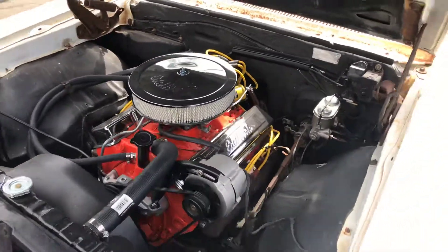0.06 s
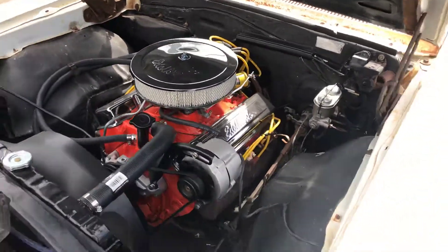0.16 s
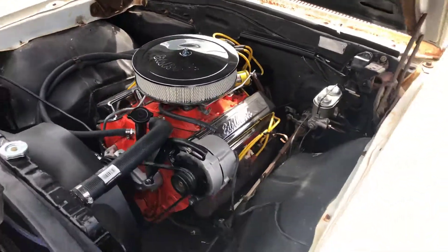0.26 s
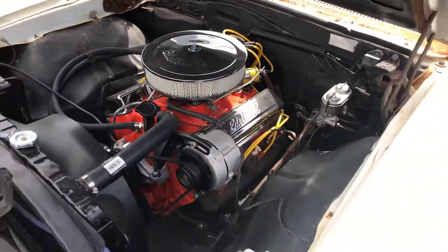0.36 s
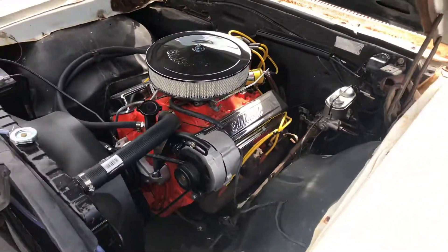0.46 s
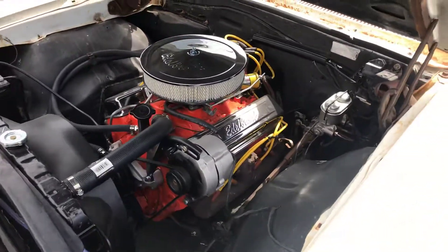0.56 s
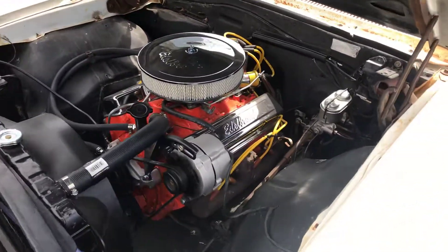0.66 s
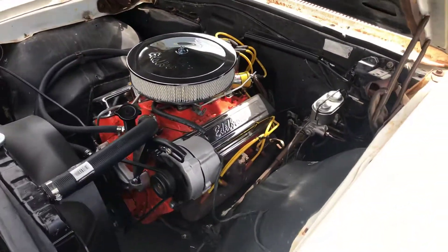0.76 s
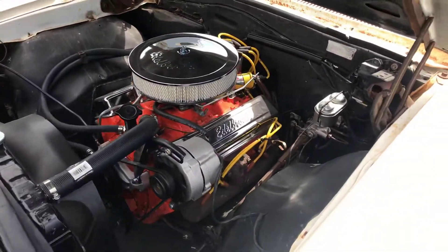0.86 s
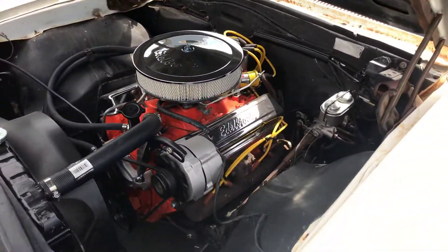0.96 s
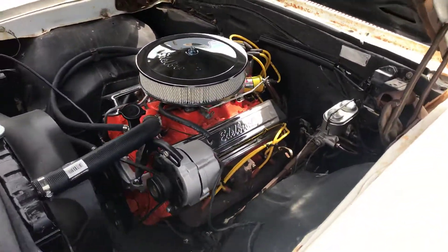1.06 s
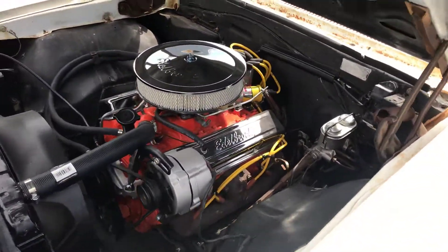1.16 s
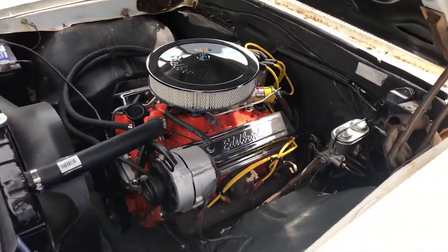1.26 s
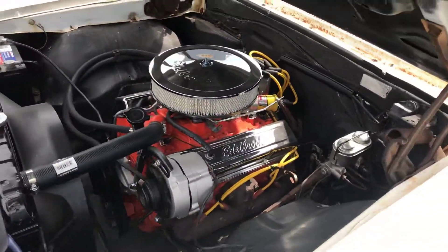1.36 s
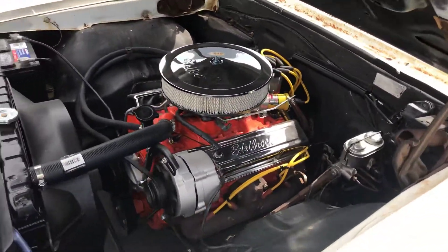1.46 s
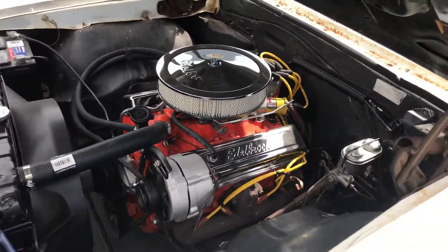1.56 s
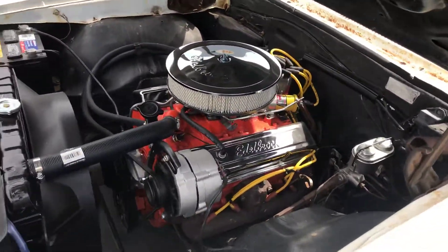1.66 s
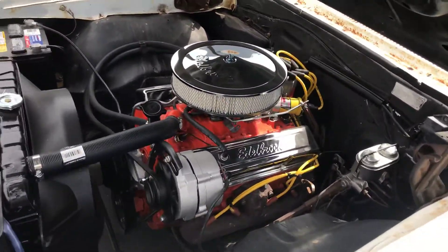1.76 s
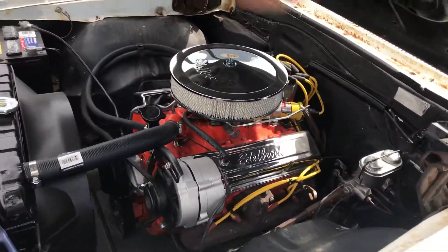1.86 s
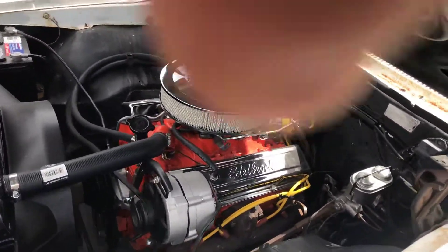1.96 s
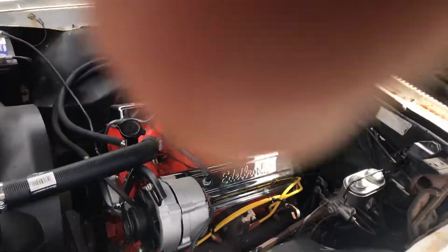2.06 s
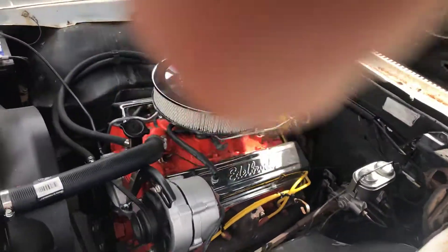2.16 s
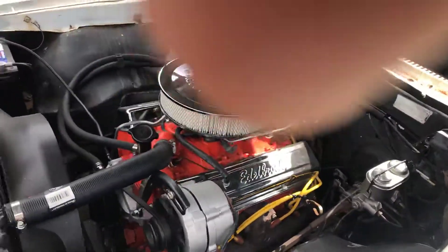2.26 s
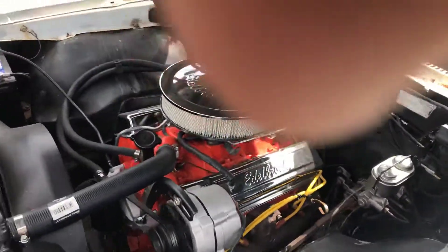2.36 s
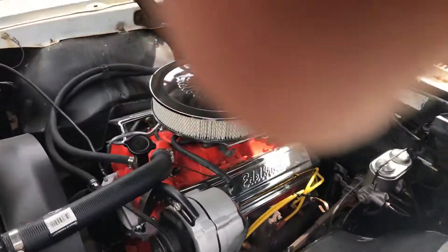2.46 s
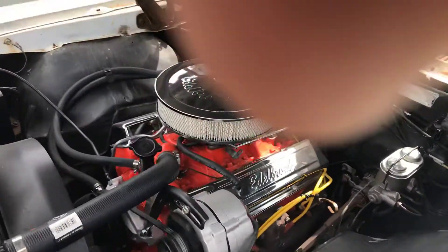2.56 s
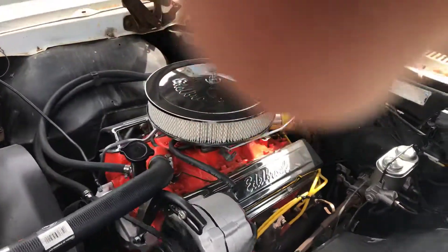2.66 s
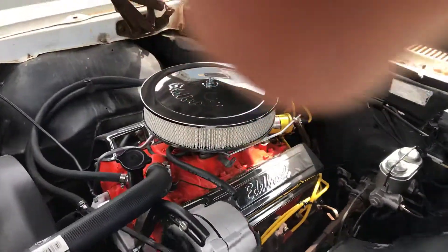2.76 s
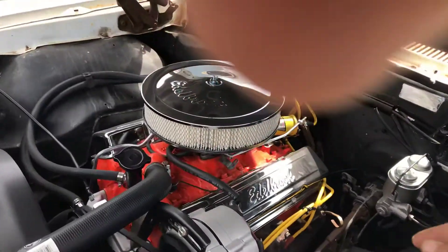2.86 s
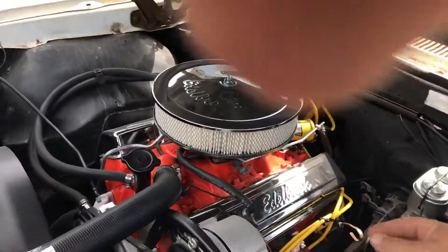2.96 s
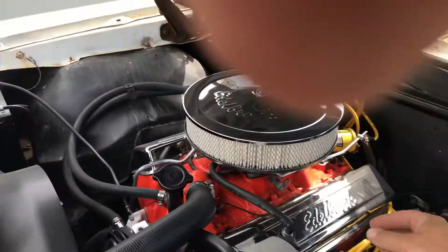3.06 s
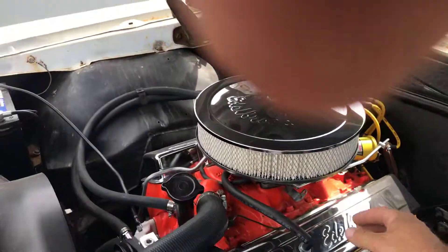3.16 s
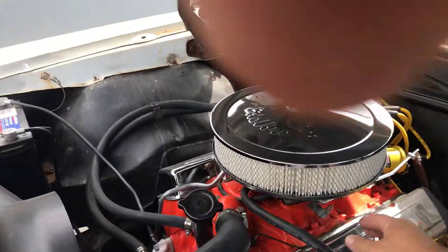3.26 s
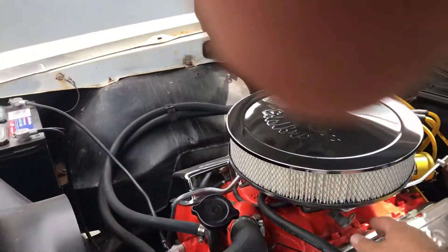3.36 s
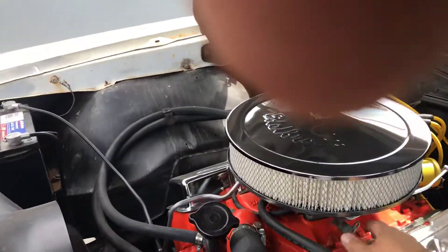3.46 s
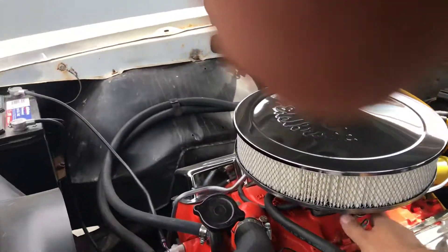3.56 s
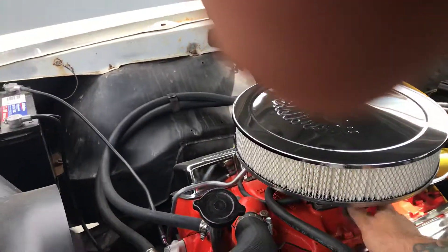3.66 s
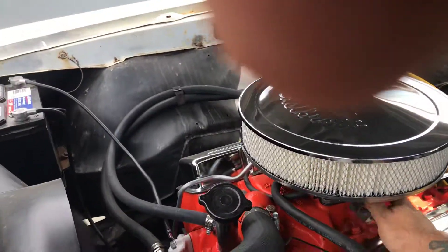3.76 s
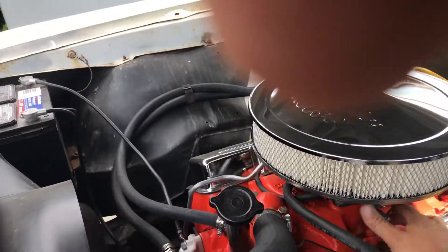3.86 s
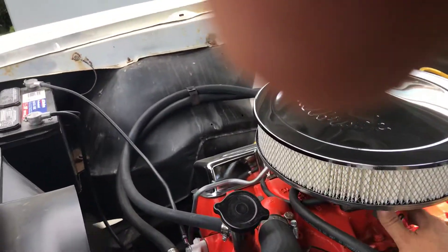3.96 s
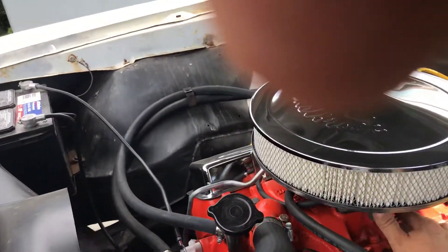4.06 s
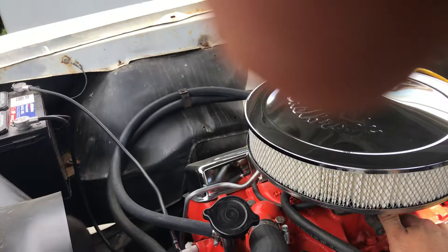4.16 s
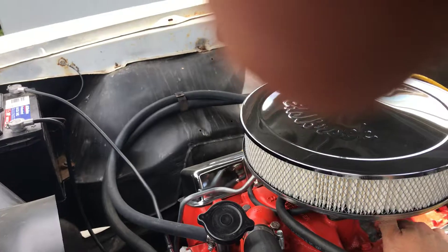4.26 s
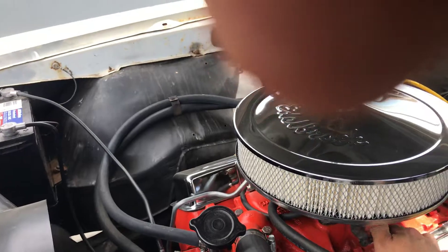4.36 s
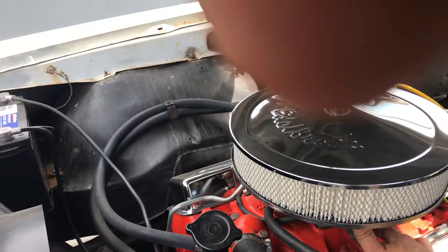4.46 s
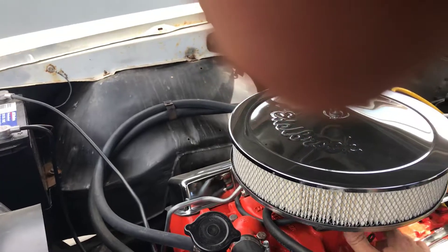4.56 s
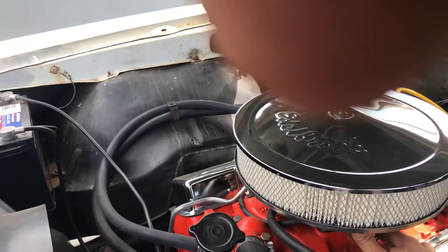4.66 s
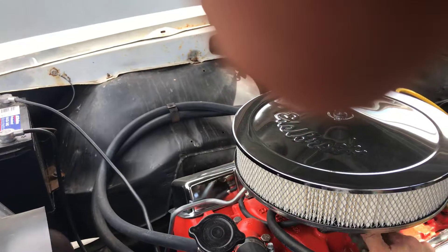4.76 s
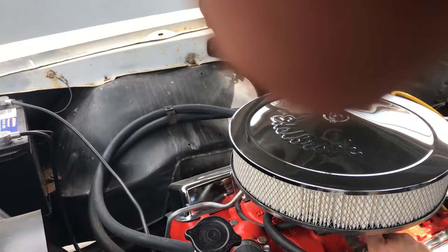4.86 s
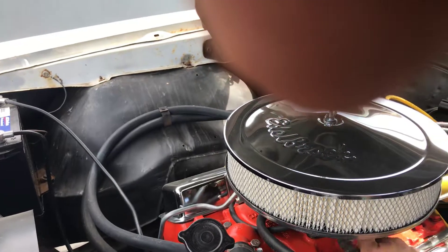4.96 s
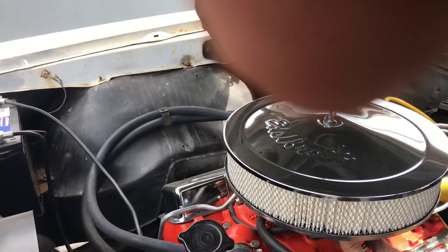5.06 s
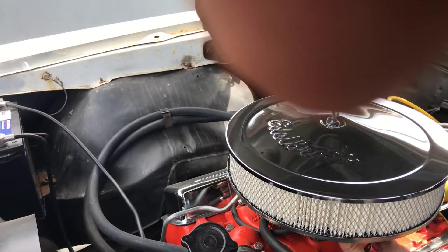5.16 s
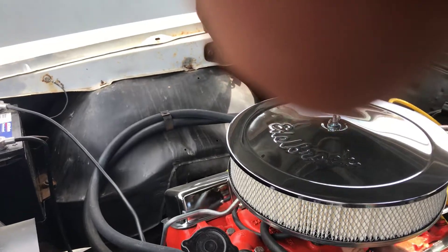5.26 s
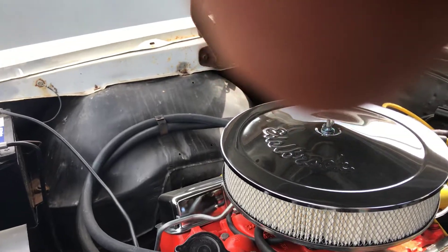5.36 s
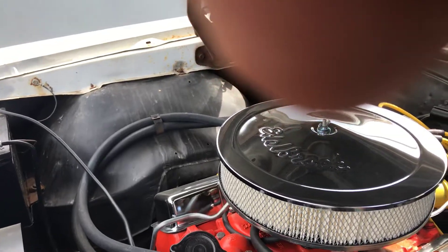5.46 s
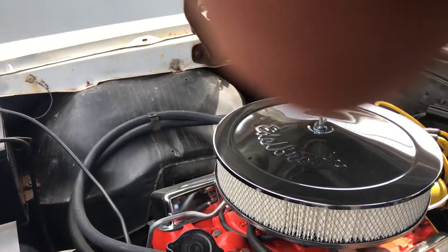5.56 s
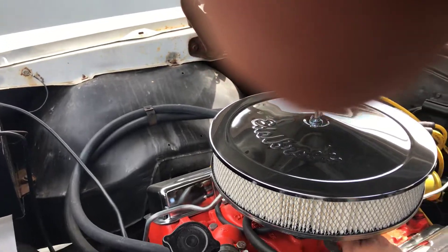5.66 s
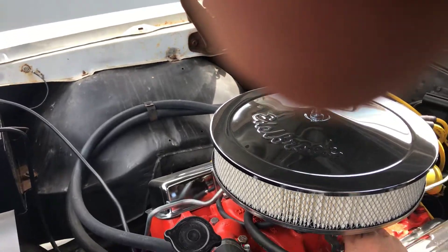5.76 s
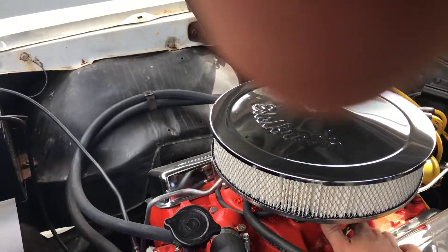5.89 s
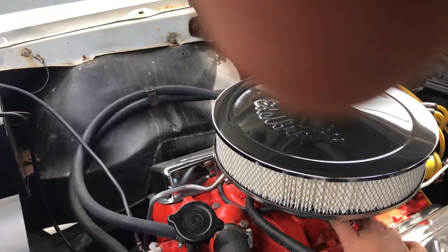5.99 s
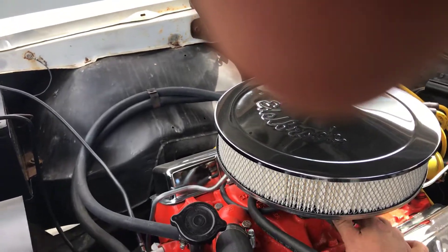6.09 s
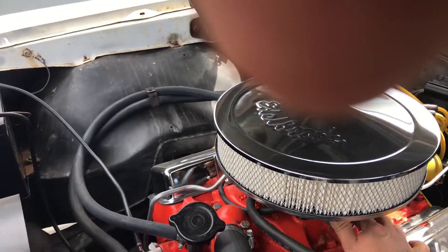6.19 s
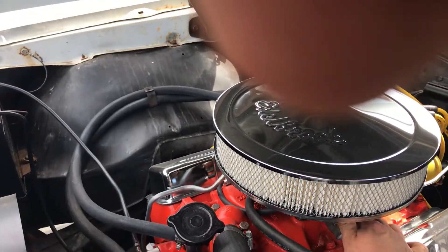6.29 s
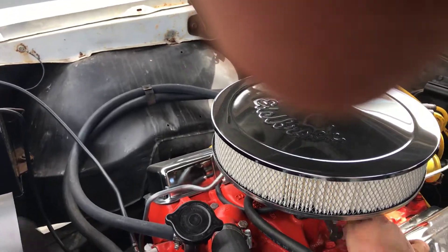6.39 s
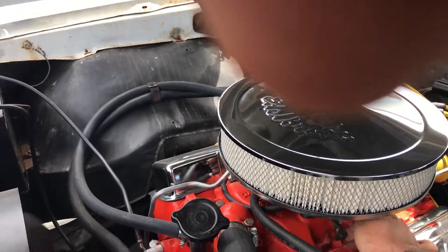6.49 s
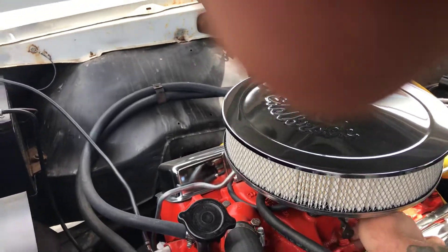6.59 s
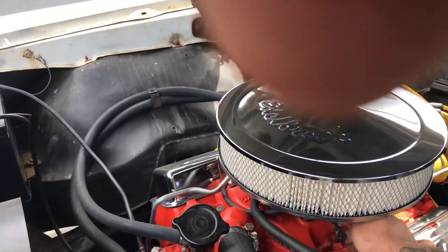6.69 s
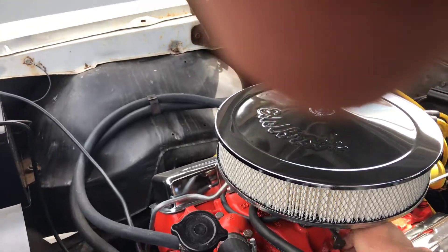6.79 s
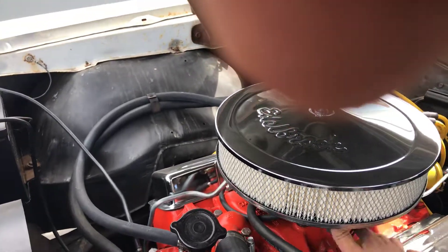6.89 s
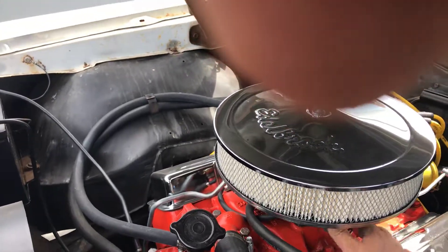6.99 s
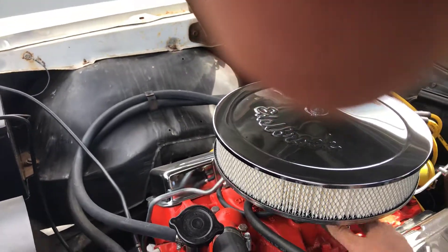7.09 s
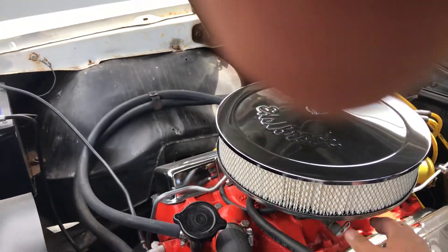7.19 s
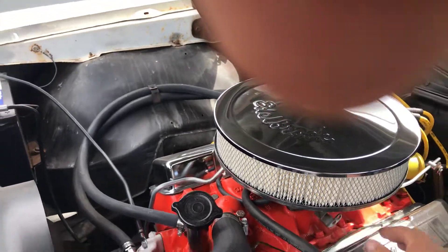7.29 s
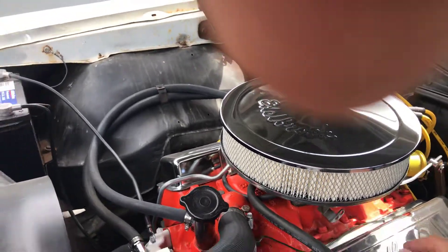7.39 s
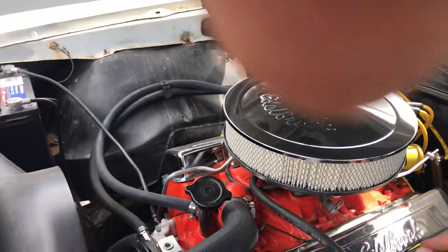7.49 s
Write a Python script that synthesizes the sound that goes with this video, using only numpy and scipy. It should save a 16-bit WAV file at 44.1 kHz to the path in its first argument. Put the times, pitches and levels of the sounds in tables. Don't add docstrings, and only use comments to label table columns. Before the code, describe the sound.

A V8 engine idles in a lumpy low rumble under an open hood, then roars through four throttle blips, the last revving highest.

```python
import sys
import numpy as np
from scipy import signal
from scipy.fft import rfft, irfft
from scipy.io import wavfile
from scipy.ndimage import uniform_filter1d, minimum_filter1d

SR = 44100
rng = np.random.default_rng(int(sys.argv[2]) if len(sys.argv) > 2 else 0)


def store_pcm(level_fs):
    pcm = np.round(np.clip(level_fs, -1, 1) * 32767).astype(np.int16)
    wavfile.write(sys.argv[1], SR, np.atleast_2d(pcm).T)


def decibels_to_gain(level_db):
    exponent = np.asarray(level_db, float) / 20
    return 10 ** exponent


N = 332073
t = np.arange(N) / SR

# (time [s], firing rate [Hz])
CRANK_SPEED = [(0, 49.9), (4.14, 48.5), (4.36, 77.4), (4.62, 112.9), (4.83, 104), (4.91, 132.4),
               (5.13, 168.3), (5.45, 132), (5.64, 127), (5.76, 151.4), (6.0, 159.4), (6.25, 130.7),
               (6.37, 125.9), (6.46, 145.8), (6.58, 164.4), (6.88, 294.5), (7.06, 291.7), (7.47, 225.5)]
# (time
# [s], level [dB])
BLOCK_EFFORT = [(0, -30.5), (1.4, -29), (2.76, -27.5), (3.37, -23.5), (4.13, -24), (4.3, -21), (4.42, -18),
                (4.7, -14.5), (4.8, -15), (5.1, -11.5), (5.25, -13), (5.6, -16.5), (5.94, -18),
                (6.05, -16.5), (6.35, -18), (6.9, -17.5), (7.1, -15), (7.53, -20)]
CYLINDER_DB = [-4.5, -5, -5.5, -5, -7, -6.5, -3.5, -8.5]
# (frequency [Hz], level per Hz [dB])
EXHAUST_IDLE = [(18, -32), (30, -13), (49, -5), (70, -5), (96, -6), (112, -5), (128, -9), (200, -12.5),
                (330, -15), (430, -46), (730, -120)]
EXHAUST_RACED = [(18, -43), (30, -21), (70, 4), (113, 3), (160, -2), (265, -4), (330, -3), (430, -26),
                 (730, -120)]
# (frequency [Hz], level per Hz [dB])
BLOCK_IDLE = [(130, -39), (220, -16), (281, -10.5), (491, 0), (517, 0.5), (596, -1.5), (686, -5.5),
              (756, -16), (890, -6.5), (1130, -16.5), (1300, -23), (1690, -45.5), (2860, -120)]
BLOCK_RACED = [(130, -40.5), (220, -14.5), (285, -17), (339, -4.5), (466, -4.5), (533, 0), (591, 4.5),
               (750, -7.5), (973, -8.5), (1150, -24.5), (1300, -23.5), (1690, -43), (2860, -120)]
# (frequency [Hz], level per Hz [dB])
RUSH_IDLE = [(590, -26), (1000, -11), (1120, -10.5), (1320, -6.5), (1540, -10), (1610, -11), (2010, -9),
             (2120, -10), (2300, -11), (2540, -15), (5200, -45), (6760, -61), (11400, -120)]
RUSH_RACED = [(590, -25.5), (1000, -0.5), (1150, -8.5), (1390, -3), (1680, -12.5), (1810, -7), (2050, -8.5),
              (2660, -21), (3610, -35), (4080, -41), (5200, -61), (6760, -90), (11400, -120)]
# (frequency [Hz], level per Hz [dB])
GULP_COLOUR = [(290, -39), (500, -18.5), (574, -9), (664, -2.5), (883, 1), (1160, -13), (1270, -8.5),
               (1390, -16.5), (2010, -10), (2280, -22.5), (2490, -14), (2890, -34), (5200, -60),
               (6760, -96), (11400, -120)]
# (frequency [Hz], level per Hz [dB])
HISS_STEADY = [(3000, -30), (4500, -6), (5000, -8), (5600, -2), (6600, 0), (9600, -5), (10400, -11),
               (11200, -6), (15500, -8), (16000, -12)]
HISS_OPEN = [(3000, -36), (4600, -10), (5000, -11), (5600, -1), (6400, 0), (9600, -4), (10400, -10),
             (11200, -4), (15500, -5), (16000, -9)]
# (start [s], hold [s], air level [dB], hiss level [dB], fade [dB/s])
GULPS = [(4.134, 0.037, -21, -61.5, 59), (4.259, 0.069, -25, -65, 62.5), (4.395, 0.04, -22, -62, 398),
         (4.499, 0.083, -43, -65.5, 39.5), (4.784, 0.1, -18.5, -54, 93), (4.954, 0.064, -24, -61, 26),
         (5.589, 0.075, -20.5, -57.5, 56.5), (6.333, 0.026, -23.5, -61.5, 68.5),
         (6.785, .06, -30, -63.5, 41), (6.958, 0.18, -26.5, -66, 31)]
# (start [s], rise [s], hold [s], intake drone level [dB], overtone level [dB])
PULLS = [(4.278, 0.032, 0.054, -24.5, -30), (4.48, 0.028, .035, -18, -36), (4.566, .02, 0.033, -23, -33.5),
         (4.805, 0.035, .02, -24, -27), (4.862, .05, 0.071, -13.5, -17.5),
         (5.644, 0.049, 0.055, -17, -19.5), (5.71, 0.058, 0.074, -14, -17), (6.382, .05, 0.089, -13, -23),
         (6.502, .05, 0.081, -16, -22), (6.606, 0.071, 0.16, -17, -14.5)]
# (multiple of the firing rate [1], level [dB])
OVERTONES = [(2, 0), (3, 2), (3.5, -16.5), (4, -9.5), (5, -17.5)]
# (multiple of the firing rate [1], level [dB])
OVERRUN = [(.5, -27.5), (.75, -32)]
# (frequency [Hz], level [dB])
CAVITY = [(330, -26), (435, -13), (475, 0), (640, 0), (850, 0), (960, -8), (1100, -28)]
# (time [s], peak level [dB], ring [Hz], T60 [s])
KNOCKS = [(0.081, -19.5, 520, 0.045), (0.653, -23, 432, 0.27), (0.989, -18, 620, 0.13),
          (1.076, -14, 480, 0.061), (1.239, -13.5, 568, 0.063), (3.117, -14, 521, 0.047),
          (3.458, -10, 520, 0.063), (5.327, -3, 531, 0.037), (5.352, 0.5, 554, 0.066),
          (5.436, -6, 546, 0.086), (6.209, -21, 533, 0.044), (6.475, 2, 643.6, 0.045),
          (6.503, -6, 625.6, 0.072), (6.555, 0, 638.5, 0.075)]
# (time [s], peak level [dB], ring [Hz], T60 [s])
BARKS = [
    (4.244, -3, 172.1, 0.036),
    (4.344, -2.5, 171.5, 0.046),
    (4.394, -4.5, 356, 0.047),
    (4.446, -5, 184, 0.034),
]
# (time [s], peak level [dB], frequency [Hz], T60 [s])
THUMPS = [
    (.335, -19.5, 55.1, 0.28),
    (2.101, -14.5, 71, .08),
    (4.431, -17, 44, 0.18),
    (5.49, -24, 65, 0.1),
]
# (time [s], crack peak [dB], crack [Hz], ring peak [dB], ring [Hz])
TAPS = [
    (1.771, -20.5, 1200, -17.5, 460),
    (1.886, -17, 800, -12, 390),
    (2.0985, 0.5, 880, -9, 327),
    (2.341, -11.5, 900, -13, 664),
    (2.364, -8, 900, -7, 378),
    (2.378, -14, 1800, -17, 369),
    (2.446, -12, 800, -25, 285),
    (2.46, -25, 2300, -24, 290),
    (2.491, -21, 700, -24, 283),
]
# (start [s], length [s], level [dB], cavity [Hz], width [Hz])
SLIDES = [
    (1.805, 0.135, -23.5, 564, 383.2),
    (2.095, .072, -26.5, 396.4, 600),
]
# (start [s], length [s], level [dB], cavity [Hz], width [Hz])
PRESSES = [
    (2.346, 0.056, -18.5, 379, 140),
    (2.345, 0.063, -20.5, 610, 198),
    (2.43, 0.04, -27, 320, 305),
]
# (start [s], length [s], level [dB], frequency [Hz], width [Hz])
SQUEAKS = [
    (4.182, .04, -62, 13800, 2500),
    (4.447, 0.045, -62.5, 13800, 2500),
    (4.812, .25, -65.5, 14500, 2500),
    (6.373, 0.021, -34.5, 2430, 199.4),
    (6.379, 0.018, -32, 2520, 200.3),
    (6.763, .14, -43, 2820, 299.4),
    (6.888, 0.031, -38, 2840, 120),
    (6.91, 0.022, -30.5, 2660, 120),
    (6.917, 0.061, -42, 2800, 350),
    (6.962, 0.08, -68, 12300, 2500),
]

CATCHES_S, SHUT_S = 4.25, 6.9


def colour(x, table):
    size = 16384
    hz, db = np.transpose(table)
    bins_hz = np.arange(size // 2 + 1) * SR / size
    log_gain = np.interp(np.log(bins_hz + 1), np.log(hz), db) * np.log(10) / 20
    cepstrum = irfft(log_gain)
    cepstrum[1:size // 2] *= 2
    cepstrum[size // 2 + 1:] = 0
    impulse = irfft(np.exp(rfft(cepstrum)))[:size // 2]
    return signal.fftconvolve(x, impulse)[:len(x)]


def even(x):
    return x / np.sqrt(uniform_filter1d(x ** 2, size=SR // 3) + 1e-18)


def blend(x, idle, full, raced):
    return (1 - raced) * even(colour(x, idle)) + raced * even(colour(x, full))


def walk(rate):
    k = int(SR / rate)
    steps = np.repeat(rng.standard_normal(N // k + 1), k)
    return 1.307 * uniform_filter1d(uniform_filter1d(steps, k), k)[:N]


def ramp(x, start, span):
    return np.clip((x - start) / span, 0, 1)


def burst(start, rise, hold, db, fade_db_s):
    return ramp(t, start, rise) * decibels_to_gain(db - fade_db_s * np.maximum(t - start - rise - hold, 0))


def louder(*gains):
    return np.sqrt(sum(g ** 2 for g in gains))


def swell(start, length):
    return np.sqrt(np.sin(np.pi * ramp(t, start, length)).clip(0))


def ring(start_s, db, hz, t60):
    out, start = np.zeros(N), int(start_s * SR) + 1
    age = t[start:start + SR // 2] - start_s
    decay = np.exp(-np.log(1000) * age / t60)
    out[start:start + SR // 2] = decibels_to_gain(db) * np.sin(2 * np.pi * hz * age) * decay
    return out


def muffle(x, hz):
    return signal.sosfilt(signal.butter(4, hz, fs=SR, output="sos"), x)


def band(x, hz, width_hz):
    edges = [max(hz - width_hz / 2, 20), min(hz + width_hz / 2, .45 * SR)]
    y = signal.sosfilt(signal.butter(2, edges, "bandpass", fs=SR, output="sos"), x)
    return y / np.sqrt(np.mean(y ** 2))


def firings(turns):
    count = int(turns[-1])
    scatter, late = rng.standard_normal((2, count))
    size = decibels_to_gain(np.resize(CYLINDER_DB, count) + 1.5 * scatter)
    at = np.interp(np.arange(count) + .5 + .2 * late, turns, np.arange(N)).astype(int)
    pulses = np.zeros(N)
    pulses[at] = size
    return pulses, size[np.minimum(turns.astype(int), count - 1)]


def exhaust(kick, hz, raced, push_db, pull):
    puff = kick + 1.3 * rng.standard_normal(N)
    pipe = even(blend(puff, EXHAUST_IDLE, EXHAUST_RACED, raced))
    boom = uniform_filter1d(pipe, size=220)
    bark = pipe - boom
    thinning = .7 * ramp(hz, 165, 25) * np.clip((SHUT_S + .5 - t) / .5, .4, 1)
    level_db = (1 - raced) * -34.5 + raced * (-27 + 0.83 * push_db)
    return decibels_to_gain(level_db) * (pipe - thinning * boom) + decibels_to_gain(-7) * pull * bark


def block(kick, gate, hz, raced, effort_db, pull):
    roar = (0.6 + gate) * rng.standard_normal(N) * decibels_to_gain(0.25 * walk(30))
    body = even(blend(0.28 * kick + roar, BLOCK_IDLE, BLOCK_RACED, raced))
    load = ramp(hz, 165, 25) * ramp(-t, -SHUT_S, .04)
    valley = signal.sosfiltfilt(signal.butter(2, [300, 470], "bandpass", fs=SR, output="sos"), body)
    body -= .6 * load * valley
    return louder(decibels_to_gain(effort_db), decibels_to_gain(1) * pull) * decibels_to_gain(-1.96) * body


def air_rush(gate, hz, raced, push_db):
    air = rng.standard_normal(N) * (0.99 + gate) * decibels_to_gain(0.87 * walk(9))
    fan = blend(air, RUSH_IDLE, RUSH_RACED, raced)
    fan_gain = decibels_to_gain(-31.5 + 3.5 * np.log2(hz / 130) + 0.4 * push_db)
    gulp = louder(*(burst(s, 0.042, hold, db, fade) for s, hold, db, _, fade in GULPS))
    gulp *= decibels_to_gain(1.2 * walk(25))
    throat = ramp(-hz, -136, 12)
    return (louder(fan_gain, (1 - throat) * gulp) * fan
            + throat * gulp * decibels_to_gain(2.0) * even(colour(air, GULP_COLOUR)))


def hiss(gate, hz, push_db):
    jet = rng.standard_normal(N) * (2.5 + gate) * decibels_to_gain(.7 * walk(14))
    steady = decibels_to_gain(-68.5 - 0.5 * np.log2(hz / 130) + 0.25 * push_db)
    opening = louder(*(burst(s - .01, .05, hold, db, fade) for s, hold, _, db, fade in GULPS))
    opening = 0.62 * opening * decibels_to_gain(1.3 * walk(45))
    return steady * even(colour(jet, HISS_STEADY)) + opening * even(colour(jet, HISS_OPEN))


def idle_hum(turns):
    tone = np.sin(4 * np.pi * turns + 0.35 * walk(30))
    return decibels_to_gain(-35 + 1.47 * walk(23.98)) * ramp(-t, -CATCHES_S, 0.056) * tone


def knocks():
    return muffle(sum(ring(s, db - 5.0, hz, t60) for s, db, hz, t60 in KNOCKS + BARKS), 1500)


def intake_drone(turns, hz, raced, pull):
    pull_top = louder(*(burst(s, rise, hold, db, 220) for s, rise, hold, _, db in PULLS))
    coast = raced * decibels_to_gain(5 * walk(18) - 11 * ramp(hz, 145, 30))
    drone_db = 20 * np.log10(louder(decibels_to_gain(-35.5) * coast, pull) + 1e-9)
    overtone_db = 20 * np.log10(louder(decibels_to_gain(-37) * coast, pull_top) + 1e-9)
    lumpy = ramp(-hz, -120, 15)
    fundamental = np.sin(2 * np.pi * turns + .7 * lumpy * walk(30))
    drone = decibels_to_gain(drone_db + (0.4 + 2.5 * lumpy) * walk(25)) * fundamental
    clear = ramp(hz, 150, 40) * ramp(drone_db, -34, 8)
    cavity_hz, cavity_db = np.transpose(CAVITY)
    overtone_db -= 5.5 * (1 - clear) + np.interp(3 * hz, cavity_hz, cavity_db)
    for k, db in OVERTONES:
        heard_db = overtone_db + db + np.interp(k * hz, cavity_hz, cavity_db)
        drone += decibels_to_gain(heard_db + 2.6 * walk(50)) * np.sin(2 * np.pi * k * turns + .55 * walk(50))
    return drone


def overrun(turns, hz):
    shut = ramp(t, SHUT_S, 0.064) * ramp(hz, 225, 50)
    return shut * sum(decibels_to_gain(db + 3.2 * walk(22)) * np.sin(2 * np.pi * k * turns + 0.75 * walk(30))
                      for k, db in OVERRUN)


def engine():
    hz = np.interp(t, *np.transpose(CRANK_SPEED))
    hz = uniform_filter1d(hz, size=2000)
    effort_db = np.interp(t, *np.transpose(BLOCK_EFFORT))
    push_db = effort_db + 16
    raced = ramp(hz, 55, 30)
    pull = louder(*(burst(s, rise, hold, db, 331.5) for s, rise, hold, db, _ in PULLS))
    turns = np.cumsum(hz * (1 + 0.00395 * walk(20))) / SR
    pulses, strength = firings(turns)
    kick = pulses * np.sqrt(SR / hz)
    gate = uniform_filter1d(strength, size=200) * (1 - 0.2 * np.cos(2 * np.pi * turns))
    rough = exhaust(kick, hz, raced, push_db, pull) + block(kick, gate, hz, raced, effort_db, pull)
    rough += air_rush(gate, hz, raced, push_db) + hiss(gate, hz, push_db)
    orders = idle_hum(turns) + intake_drone(turns, hz, raced, pull) + overrun(turns, hz)
    return rough + np.sqrt(2) * orders + knocks()


def finger():
    hits = sum(ring(*row) for row in THUMPS)
    for s, crack_db, crack_hz, db, hz in TAPS:
        hits += ring(s, crack_db, crack_hz, .007) + ring(s, db, hz, 0.027)
    out = muffle(muffle(hits, 3800), 4900)
    grains = rng.standard_normal(N) * decibels_to_gain(1.54 * walk(120))
    scratch = even(colour(grains, SCRATCH_COLOUR))
    dull = muffle(muffle(scratch, 2800), 4200)
    # rows, scratch level [dB], openness of the port
    for rows, scratch_db, port in ((SLIDES, -1.5, 0.82), (PRESSES, -14.5, 0)):
        top = decibels_to_gain(scratch_db) * (dull + port * (scratch - dull))
        for s, length, db, hz, width_hz in rows:
            cavity = muffle(band(grains, hz, width_hz), 2800)
            out += decibels_to_gain(db) * swell(s, length) * (cavity + top)
    return out


# (frequency [Hz], level per Hz [dB])
SCRATCH_COLOUR = [(530, -32), (900, -4.5), (1450, -3.5), (1750, -6), (1910, -14), (2120, -9), (3460, -27),
                  (4800, -37), (6000, -53), (15500, -49)]


def squeaks():
    noise = rng.standard_normal(N)
    return sum(decibels_to_gain(db) * swell(s, length) * band(noise, hz, width_hz)
               for s, length, db, hz, width_hz in SQUEAKS)


def scene():
    return (engine() + finger() + squeaks())[None]


def top_cut(x):
    return signal.sosfilt(signal.butter(12, 15840, fs=SR, output="sos"), x)


def record(dry):
    x = signal.sosfilt(signal.butter(3, 34, "highpass", fs=SR, output="sos"), dry)
    gain = minimum_filter1d(np.minimum(1, .99 / (abs(x) + 1e-9)), size=441)
    end = np.sin(np.pi / 2 * ramp(-t, -t[-1], .004)) ** 2
    return top_cut(x * uniform_filter1d(gain, size=441) * end)


dry = scene()
out = record(dry)
store_pcm(out)
```